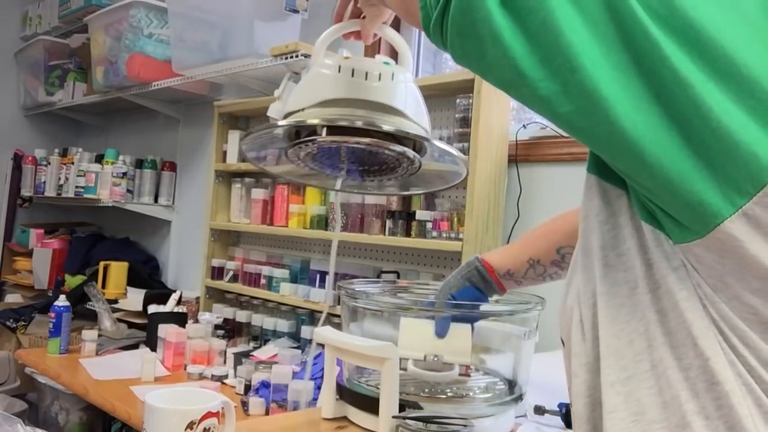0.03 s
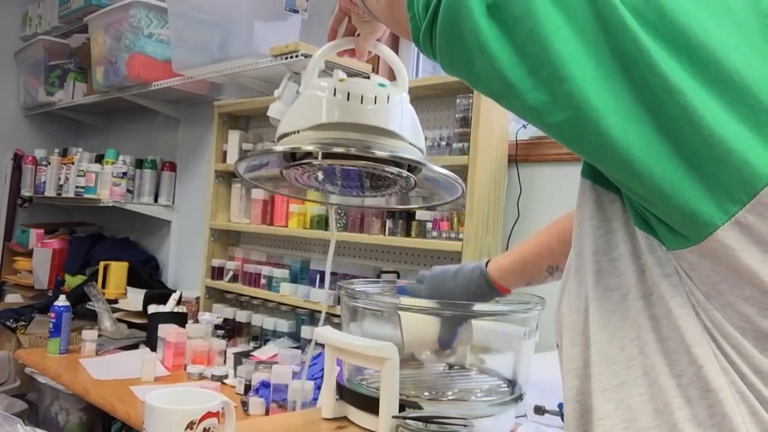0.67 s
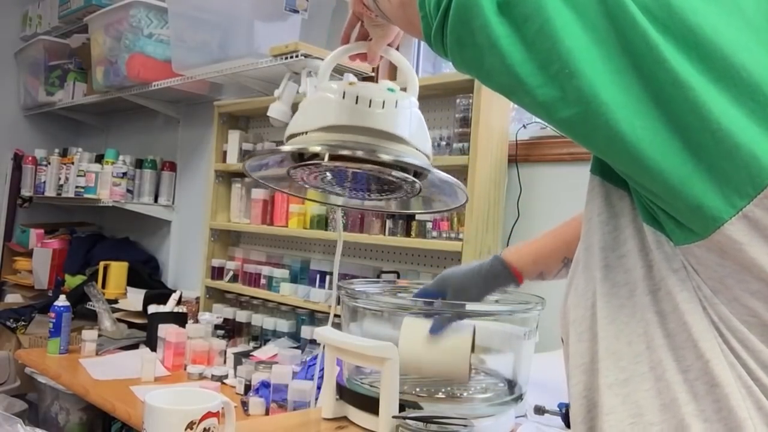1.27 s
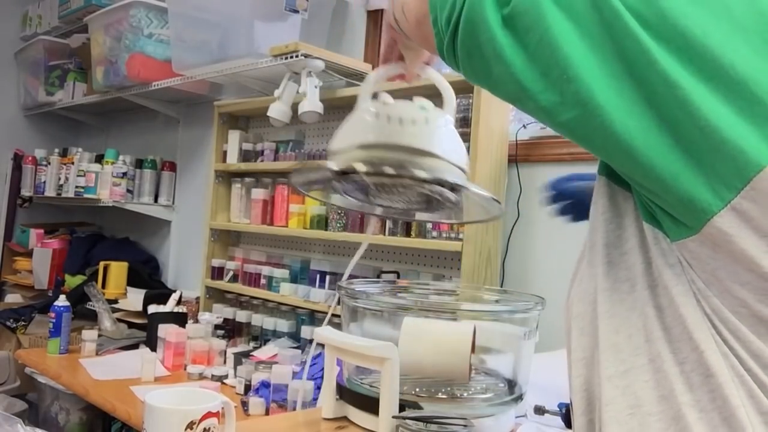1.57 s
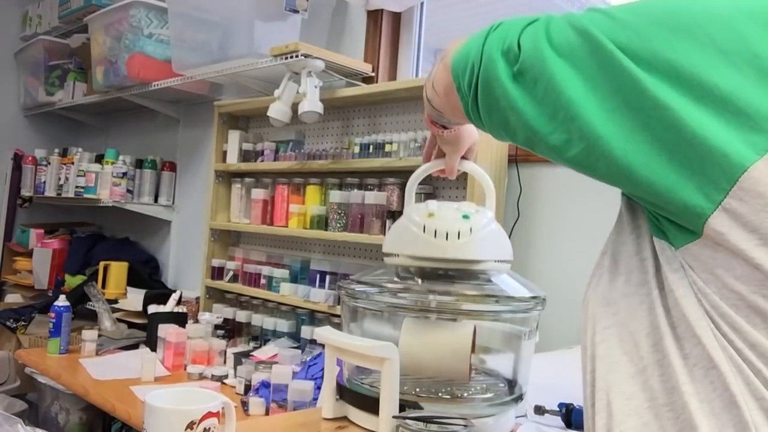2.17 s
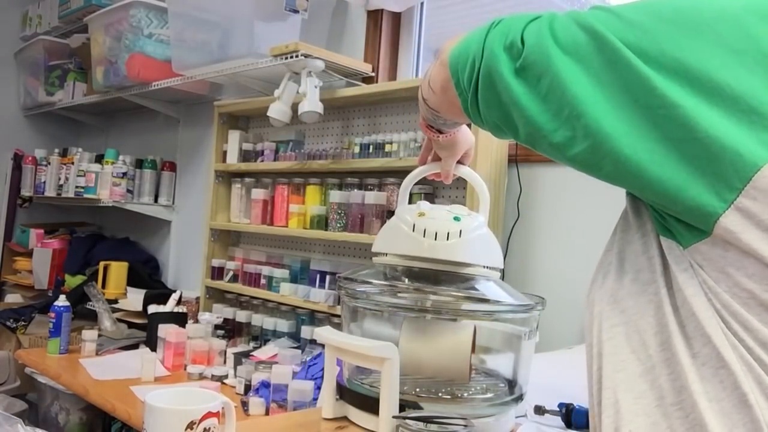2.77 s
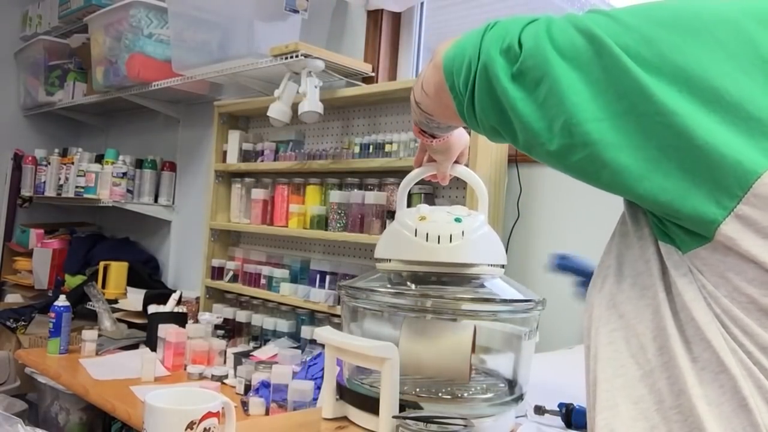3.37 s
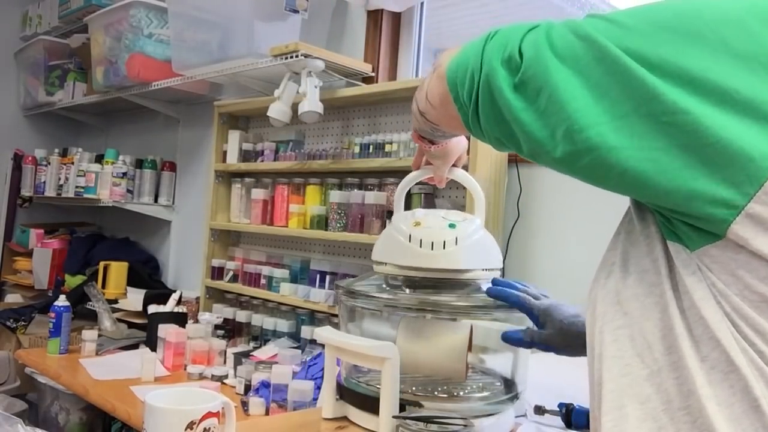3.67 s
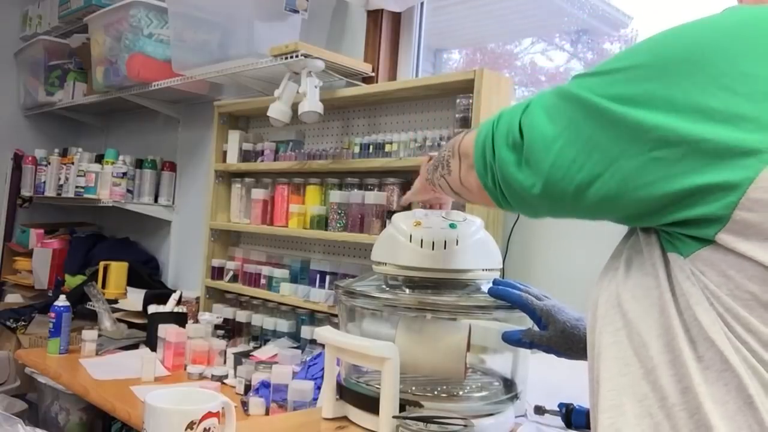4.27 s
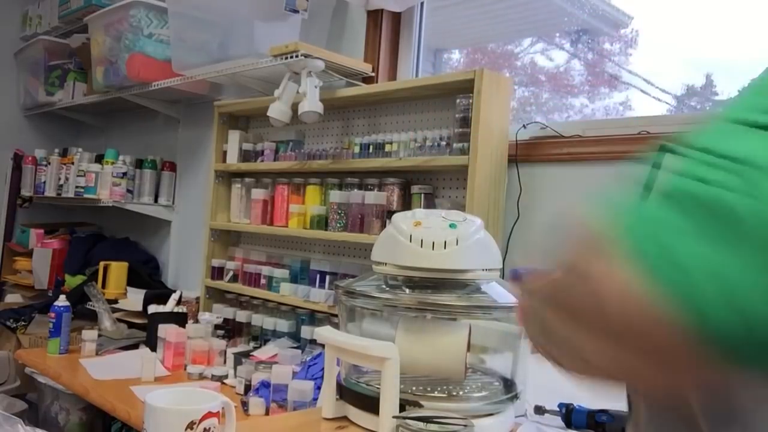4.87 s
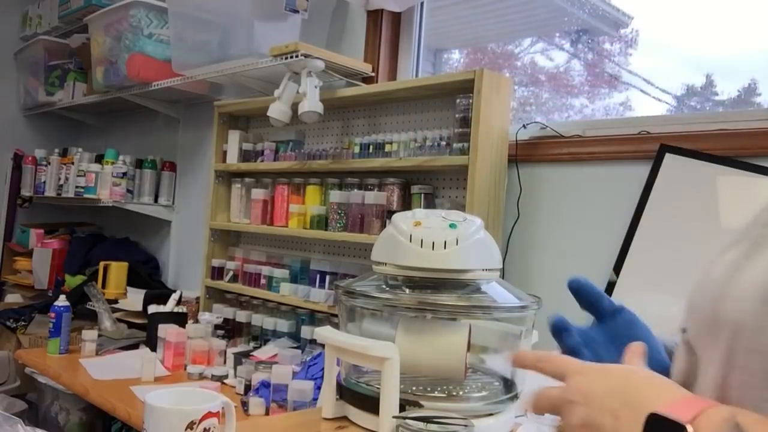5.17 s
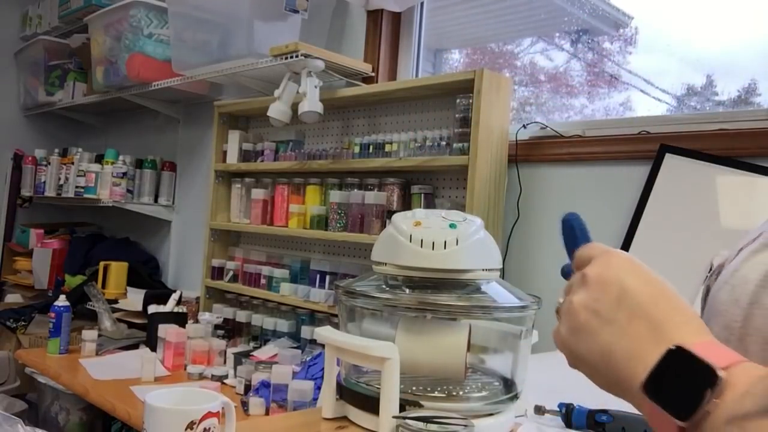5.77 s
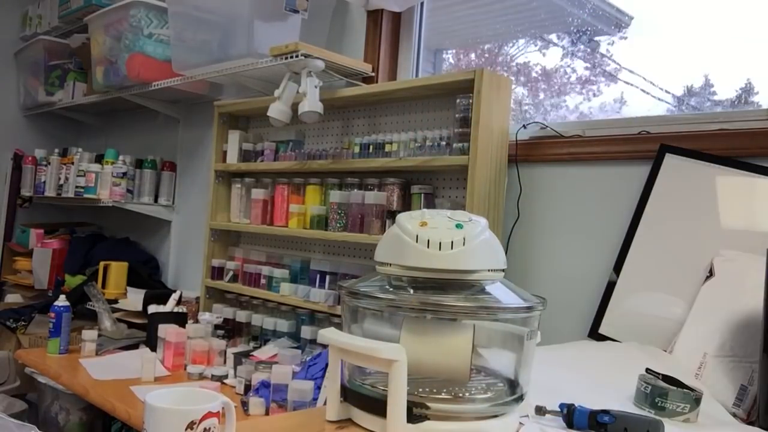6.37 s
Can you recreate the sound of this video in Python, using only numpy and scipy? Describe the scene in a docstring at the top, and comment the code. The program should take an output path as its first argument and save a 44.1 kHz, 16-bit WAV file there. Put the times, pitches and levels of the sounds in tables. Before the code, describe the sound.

Ceramic scrapes and clinks inside a glass countertop oven, then the heavy lid rattles shut and a fan runs up softly.

```python
"""A ceramic mug scrapes, clinks and squeals on the wire rack in the glass bowl of a countertop oven.
The heavy glass lid is set on, rocks on the rim and drops into its seat, ringing the bowl and
thudding into the bench. Its plastic handle snaps down and the convection fan runs up with a hum,
rising blade tones and air noise. A work glove is tugged off and flops onto the bench.
Contacts drive damped modes and noise tails that die with the small workroom."""
import sys
import numpy as np
from scipy import signal
from scipy.fft import irfft
from scipy.io import wavfile

SR = 44100
rng = np.random.default_rng(int(sys.argv[2]) if len(sys.argv) > 2 else 0)


def to_wav(sig):
    """Store sig (one row per channel, or 1-D mono) as 16-bit WAV at the path in sys.argv[1].

    Samples outside -1..1 are clipped; the rate is SR.
    """
    pcm = np.clip(np.atleast_2d(sig), -1, 1) * 32767
    pcm = np.round(pcm).astype(np.int16)
    wavfile.write(sys.argv[1], SR, pcm.T)  # frames by channels


N = 291847
TIME_S = np.arange(N) / SR


def from_db(db):
    """Decibels to gain."""
    return 10 ** (np.asarray(db) / 20)


def unit_rms(x):
    """Scale to rms 1."""
    return x / np.sqrt(np.mean(x ** 2) + 1e-20)


def at_time(curve):
    """A (t/s, value) curve at every sample."""
    return np.interp(TIME_S, *np.transpose(curve))


def at_hz(curve, hz):
    """An (f/Hz, value) curve read on a log-frequency axis."""
    knots_hz, values = np.transpose(curve)
    return np.interp(np.log(hz), np.log(knots_hz), values)


def wander(steps_per_s):
    """Slow random curve, spread about 1."""
    steps = np.clip(rng.standard_normal(2000), -1.7, 1.7)
    return np.interp(TIME_S * steps_per_s, np.arange(len(steps)), steps)


def clicks(times_s, levels_db):
    """One impulse per contact."""
    out = np.zeros(N)
    np.add.at(out, np.clip(np.round(times_s * SR).astype(int), 0, N - 1), from_db(levels_db))
    return out


def strokes(rows, sag_db_per_s, stop_db_per_s):
    """Gain of rubbing strokes: quadratic rise, sloping hold, fast stop."""
    out = np.zeros(N)
    for start_s, rise_s, hold_s, level_db in rows:
        attack = np.clip((TIME_S - start_s) / rise_s, 0, 1) ** 2
        past_rise_s = np.maximum(TIME_S - start_s - rise_s, 0)
        sag_db = sag_db_per_s * np.minimum(past_rise_s, hold_s)
        stop_db = stop_db_per_s * np.maximum(past_rise_s - hold_s, 0)
        out += attack * from_db(level_db - sag_db - stop_db)
    return out


def ring(force, hz, t60_s):
    """One damped mode; a unit click starts it at rms 1."""
    radius, angle = from_db(-60 / (t60_s * SR)), 2 * np.pi * hz / SR
    feedback = [1, -2 * radius * np.cos(angle), radius * radius]
    return signal.lfilter([0, np.sqrt(2) * np.sin(angle)], feedback, force + 1e-18)


def ring_modes(force, modes):
    """Sum of damped modes, alternating in sign."""
    return sum(from_db(db) * (-1) ** k * ring(force, hz, t60_s)
               for k, (hz, db, t60_s) in enumerate(modes))


def leak(energy, t60_s):
    """Stored energy, falling 60 dB in t60_s."""
    return signal.lfilter([1], [1, -from_db(-120 / (t60_s * SR))], energy + 1e-24)


def noise_bands(spectrum):
    """24 noise bands as (f/Hz, signal); total rms about 1."""
    edges_hz = np.geomspace(25, 19500, 25)
    centres_hz = np.sqrt(edges_hz[1:] * edges_hz[:-1])
    white = rng.standard_normal((2, N))
    gains = from_db(at_hz(spectrum, centres_hz)) * np.sqrt(np.diff(edges_hz))
    gains /= np.linalg.norm(gains)
    for k, hz in enumerate(centres_hz):
        bandpass = signal.butter(2, edges_hz[k:k + 2], "band", fs=SR, output="sos")
        yield hz, gains[k] * unit_rms(signal.sosfilt(bandpass, white[k % 2]))


def noise(spectrum):
    """Steady coloured noise, rms about 1."""
    return sum(band for _, band in noise_bands(spectrum))


# room decay: f/Hz, t60/s
ROOM_DECAY = [(60, 0.26), (150, 0.47), (300, 0.21), (700, 0.22), (2000, 0.24), (6000, 0.26), (15000, 0.075)]

def wash(force, spectrum, direct_db, direct_t60_s, room_t60_scale=1.0):
    """Dense overlapping modes as noise: a direct burst, then a tail that dies with the room."""
    energy, out = force ** 2, np.zeros(N)
    direct = from_db(direct_db) ** 2 * leak(energy, direct_t60_s)
    for hz, band in noise_bands(spectrum):
        tail = leak(energy, room_t60_scale * at_hz(ROOM_DECAY, hz))
        lag = np.exp(-4 * hz / SR)  # quarter-cycle build-up
        out += band * signal.lfilter([1 - lag], [1, -lag], np.sqrt(direct + tail))
    return out


# room background: f/Hz, density/dB
ROOM_SPECTRUM = [(15, -64), (25, -35), (47, -14.5), (74, -5.5), (129, -7), (204, -11.5), (247, -12),
                 (363, -19), (404, -25), (546, -20.5), (679, -28), (1670, -31), (2140, -34.5),
                 (17000, -45.5)]

def room_tone(level_db=-61.5):
    """Quiet, steady rumble of the room."""
    return from_db(level_db) * noise(ROOM_SPECTRUM)


# air noise at top speed: f/Hz, density/dB
AIR_SPECTRUM = [(24, -41), (40, -17), (123, -1.5), (152, -9), (203, -6), (405, -14), (479, -20.5),
                (668, -27.5), (1080, -40), (1240, -17), (2260, -36), (2480, -32.5), (12000, -61),
                (15600, -86), (22000, -120)]
# blade tones: harmonic number, level/dB
BLADE_TONES = [(1, -9), (2, -15.5), (4, -27), (6, -23)]
# oven cavity resonances: f/Hz, level/dB, t60/s
CAVITY_MODES = [(253, -14, 0.29), (534.3, -16, 0.3), (681, -12.5, 0.12), (830, -20, 0.15)]

def fan(on_s=4.34, rise_hz_per_s=92.0, hum_hz=125.3, flow_db=-52.5, hum_db=-52):
    """Even run-up: hum grows, air noise swells and brightens, blade tones swell at cavity resonances."""
    blade_hz = rise_hz_per_s * np.maximum(TIME_S - on_s, 1 / SR)
    speed = blade_hz / blade_hz.max()
    slowness = 1 - speed
    air = sum(band * from_db(-12 * slowness * np.log2(1 + hz / 400))
              for hz, band in noise_bands(AIR_SPECTRUM))
    cavity = sum(from_db(db) * unit_rms(ring(rng.standard_normal(N), hz, t60_s))
                 for hz, db, t60_s in CAVITY_MODES)
    phase = 2 * np.pi * np.cumsum(blade_hz) / SR
    blades = from_db(-10 * slowness) * sum(from_db(db) * np.sin(k * phase) for k, db in BLADE_TONES)
    swell = np.zeros(N)
    for hz, _, t60_s in CAVITY_MODES[2:]:
        q = hz * t60_s * np.pi / np.log(1000)
        swell += signal.lfilter(*signal.iirpeak(hz, q, fs=SR), blades)
    flow = air + cavity + blades + from_db(14) * swell
    hum = np.sin(2 * np.pi * hum_hz * TIME_S)
    doublings = np.log2(speed)  # 0 at top speed
    return from_db(flow_db + 14 * doublings) * flow + from_db(hum_db + 11 * doublings) * hum


# tugs on the glove: start/s, rise/s, hold/s, level/dB
GLOVE_TUGS = [(5.33, 0.26, 0.12, -66), (5.76, 0.17, 0.025, -70.5)]
# cloth on skin: f/Hz, density/dB
TUG_SPECTRUM = [(500, -5.5), (1200, 8.5), (3500, 0.5), (7000, -5), (11000, -1), (16500, -0.5)]
# glove landing: t/s, level/dB
GLOVE_FLOPS = [(6.266, -53.5), (6.29, -53.5), (6.298, -50), (6.311, -40.5)]
# cloth on bench: f/Hz, density/dB
FLOP_SPECTRUM = [(59, -32.5), (100, -5), (281, -1), (821, -11.5), (1020, -6), (2110, -11), (3050, -17),
                 (8370, -28), (9930, -43), (17000, -28)]

def glove():
    """Knitted cloth hisses over the skin, then flops down."""
    landing = from_db(-2) * clicks(*np.transpose(GLOVE_FLOPS))
    flop = wash(landing, FLOP_SPECTRUM, direct_db=8.5, direct_t60_s=0.01, room_t60_scale=0.51)
    hiss = strokes(GLOVE_TUGS, sag_db_per_s=-1, stop_db_per_s=127) * noise(TUG_SPECTRUM)
    return hiss + flop


# handle on its catch: t/s, level/dB
LATCH_TICKS = [(4.3305, -41), (4.3352, -43), (4.3415, -24), (4.3487, -29)]
# spring and stop: f/Hz, level/dB, t60/s
SPRING_MODES = [(2300, -1, .008), (5200, 4, .006), (7400, 4, .005), (10500, 5, .004), (14000, 7, .004)]
# plastic housing: f/Hz, level/dB, t60/s
HOUSING_MODES = [(299, -7.5, 0.048), (656, -1, 0.017), (800, -18, 0.1), (1417, -13, 0.066),
                 (2004, -5.5, 0.066), (4950, -7, 0.027), (6290, -9, 0.047)]
# dense housing modes: f/Hz, density/dB
HOUSING_SPECTRUM = [(29, -37), (50, -39), (99, -6), (289, -4), (438, -13), (663, -1.5), (731, 22),
                    (806, -7), (1080, -11.5), (1160, -6.5), (1990, -12.5), (2660, -21.5), (5020, -16.5),
                    (11000, -21.5), (17000, -16)]

def latch():
    """The handle ticks over its catch, ringing the housing; at the hardest tick the spring snaps home."""
    force = clicks(*np.transpose(LATCH_TICKS))
    snap = ring_modes(force * (force == force.max()), SPRING_MODES)
    dense = wash(force, HOUSING_SPECTRUM, direct_db=7, direct_t60_s=0.14)
    return snap + ring_modes(force, HOUSING_MODES) + from_db(-8) * dense


# lid's full weight landing: t/s, level/dB
BENCH_BOOMS = [(2.696, -42), (3.8, -48)]

def bench():
    """The bench top gives under the lid and swings in its lowest mode."""
    return ring(clicks(*np.transpose(BENCH_BOOMS)), hz=78, t60_s=0.38)


# glass bowl: f/Hz, gain from rack/dB, gain from lid/dB, t60/s
BOWL_MODES = [(318, -38, -14, 0.7), (748, -38, -21, 0.85), (1298, -31, -30, 0.5)]

def bowl(force, settling_db_per_s=9.0, seated_s=3.9, seated_db_per_s=128.0):
    """Thick glass sings after blows, less as the lid settles, and stops once it is seated."""
    times_s, _, thud_db, _ = np.transpose(LID_KNOCKS)
    cushioned = np.sign(force) * np.sqrt(np.abs(force))  # springy rack softens hard strikes
    from_rack = from_db(-14.5 - at_time(MUG_WEIGHT)) * cushioned  # weight mutes the glass
    from_lid = clicks(times_s, thud_db - settling_db_per_s * (times_s - times_s[0]))
    song = sum(ring(from_db(rack_db) * from_rack + from_db(lid_db) * from_lid, hz, t60_s)
               for hz, rack_db, lid_db, t60_s in BOWL_MODES)
    return song * from_db(-seated_db_per_s * np.maximum(TIME_S - seated_s, 0))


# mug's load on the rack: t/s, weight/dB
MUG_WEIGHT = [(0.0, 11), (0.45, -1), (0.7, -2), (0.9, 3.5), (1.13, 6), (1.27, 6), (1.5, 10), (3.8, 8.5)]
# bowl and stand: f/Hz, density/dB
STAND_SPECTRUM = [(25, -14.5), (70, 1), (140, 10.5), (220, -19.5), (350, 2.5), (550, 2), (900, -43),
                  (1700, -17.5), (3000, -28)]

def stand_rumble(force, drive_db=-39.5, compression_power=0.59):
    """The mug's weight shakes bowl and stand even when the scrape is gentle."""
    shake = np.sign(force) * np.abs(force) ** compression_power * from_db(drive_db + at_time(MUG_WEIGHT))
    hollow = from_db(-3.5) * ring(shake, hz=570, t60_s=0.063)
    hollow += from_db(-5.5) * ring(shake, hz=365, t60_s=0.15)
    return hollow + wash(shake, STAND_SPECTRUM, direct_db=-1.5, direct_t60_s=0.04, room_t60_scale=0.56)


# friction squeals: start/s, hold/s, f/Hz, level/dB
FRICTION_SQUEALS = [(0.386, 0.019, 7210, -23.5), (0.398, 0.08, 4243, -38.5), (0.438, 0.0099, 6030, -26),
                    (0.439, 0.025, 9354, -30.5), (0.483, .02, 10546, -50), (0.517, 0.03, 2313, -37),
                    (1.134, .015, 7220, -33.5), (1.193, 0.031, 5460, -38), (1.194, 0.029, 6304, -38),
                    (1.201, 0.023, 2277, -43), (3.013, 0.049, 755, -60), (3.218, 0.083, 765, -65.5),
                    (3.833, 0.02, 6560, -46), (3.877, 0.026, 5480, -52.5)]

def squeals(rise_s=0.0017, t60_s=0.04):
    """Friction locks onto one wire or glass mode, holds its level, then lets it ring out."""
    out = np.zeros(N)
    for start_s, hold_s, hz, level_db in FRICTION_SQUEALS:
        active = (TIME_S > start_s) & (TIME_S < start_s + 0.5)
        age_s = TIME_S[active] - start_s
        decay_db = 60 * np.maximum(age_s - hold_s, 0) / t60_s
        envelope = (1 - np.exp(-age_s / rise_s)) * from_db(level_db - decay_db)
        out[active] += np.sqrt(2) * envelope * np.sin(2 * np.pi * (hz * age_s + rng.random()))
    return out


# mug striking the rack: t/s, level/dB
MUG_CLINKS = [(0.0, -48.5), (0.043, -47), (0.189, -56), (0.237, -42), (0.285, -54.5), (0.304, -42.5),
              (0.338, -36), (0.365, -32.5), (0.387, -20.5), (0.439, -27.5), (0.483, -25.5), (0.703, -38),
              (0.846, -32.5), (0.895, -30.5), (1.134, -24.5), (1.184, -23.5), (1.401, -41), (1.447, -42.5),
              (1.56, -61.5), (3.832, -40.5), (3.876, -50)]
# mug pushed over the wires: start/s, rise/s, hold/s, level/dB
MUG_SLIDES = [(0.20, 0.27, 0.28, -27), (0.78, 0.11, 0.062, -30.5), (1.08, 0.12, 0.03, -26.5),
              (3.79, 0.027, 0.02, -45), (3.965, 0.031, 0.0052, -64.5)]

def mug_force(slips_per_s=700, uneven_db=5.0, slip_db=-10.5):
    """Clean strikes plus the tiny uneven slips of unglazed ceramic on wire."""
    slide = strokes(MUG_SLIDES, sag_db_per_s=48.5, stop_db_per_s=201)
    sizes = slide * from_db(slip_db + uneven_db * np.clip(rng.standard_normal(N), -2, 1.5))
    slips = (rng.random(N) < slips_per_s / SR) * sizes * rng.choice([-1, 1], N)
    return clicks(*np.transpose(MUG_CLINKS)) + slips


# main modes of the wire rack: f/Hz, level/dB
RACK_MODES = [(2315, -53), (3494, -63), (4242, -54), (4447, -58), (4624, -61), (5356, -55), (6024, -53),
              (6304, -52), (6412, -51), (6821, -61), (7214, -51), (8376, -61), (8958, -61), (9351, -53),
              (9625, -55), (9927, -62), (10072, -60), (10390, -61), (10546, -50), (11165, -55),
              (12112, -65), (12581, -57), (12947, -60), (13281, -56), (13722, -62), (14303, -58),
              (14653, -59), (14917, -63), (15913, -64), (16258, -57)]
# dense rack modes: f/Hz, density/dB
RACK_SPECTRUM = [(900, -50), (1700, -14), (2300, -9.5), (2900, -4), (3600, -10.5), (4200, -4),
                 (4900, -13.5), (6200, 8), (8000, 2.5), (10000, -31), (12000, -0.5), (16500, -12.5)]

def rack(force, ring_db=34.5, t60_at_4khz_s=0.23, shift_db=4.0, shifts_per_s=28.0):
    """The wires ring, high modes more briefly; the moving contact favours now one mode, now another."""
    out = np.zeros(N)
    for hz, level_db in RACK_MODES:
        t60_s = t60_at_4khz_s * (hz / 4000) ** -0.3
        coupling = from_db(shift_db * wander(shifts_per_s)) * rng.choice([-1, 1])
        out += from_db(level_db + ring_db) * ring(force * coupling, hz, t60_s)
    for _ in range(2):
        coupling = from_db(shift_db * wander(shifts_per_s))
        out += from_db(-8.5) * signal.fftconvolve(force * coupling, weak_rack_modes())[:N]
    dense = wash(force, RACK_SPECTRUM, direct_db=8, direct_t60_s=0.012, room_t60_scale=0.8)
    out += from_db(-11.5) * dense
    lows = signal.sosfiltfilt(signal.butter(1, 8500, fs=SR, output="sos"), out)
    treble_gain = from_db(-0.88 * at_time(MUG_WEIGHT))  # a light touch is brighter
    return lows + treble_gain * (out - lows)


def weak_rack_modes(t60_s=0.15, spread_at_6khz_hz=140.0, per_mode=12):
    """Impulse response of the lesser modes crowding around each main one."""
    age_s = np.arange(SR // 2) / SR
    main_hz, level_db = np.repeat(RACK_MODES, per_mode, axis=0).T
    offset_hz = spread_at_6khz_hz * rng.laplace(size=len(main_hz)) * np.sqrt(main_hz / 6000)
    hz = np.clip(main_hz + offset_hz, 1500, 17400)
    spectrum = np.zeros(SR // 2 + 1, complex)  # 1 Hz bins
    spectrum[hz.astype(int)] = from_db(level_db / 2) * np.exp(2j * np.pi * rng.random(len(hz)))
    return unit_rms(irfft(spectrum))[:len(age_s)] * from_db(-60 * age_s / t60_s)


# damped oven body: f/Hz, level/dB, t60/s
OVEN_MODES = [(141, -10.5, 0.21), (309, -5, 0.069), (647, -17, 0.24), (1640, -28, 0.12)]
# oven body and bench: f/Hz, density/dB
THUD_SPECTRUM = [(25, -27), (45, -19), (70, -0.5), (120, -1), (190, 4), (320, 7.5), (450, -12), (650, -0.5),
                 (950, -34.5), (1600, -14), (2500, -76), (6000, -65)]

def oven_thud(force):
    """A knock passes through the oven body into the bench."""
    dense = wash(force, THUD_SPECTRUM, direct_db=2, direct_t60_s=0.059)
    return ring_modes(force, OVEN_MODES) + from_db(-4.5) * dense


# rim grinding into its seat: start/s, rise/s, hold/s, level/dB
RIM_GRINDS = [(3.76, 0.012, 0.029, -31.5)]
# hard glass contact: f/Hz, density/dB
CRACK_SPECTRUM = [(200, 24), (900, 10.5), (1700, 12), (3300, 4.5), (4500, 8), (6500, 1), (9000, 1),
                  (12000, -2), (16500, -3)]

def rim_crack(force, grains_per_s=500, grain_db=-10.0):
    """Glass on glass: a sharp crack per knock, a short grind as the lid seats."""
    seating = strokes(RIM_GRINDS, sag_db_per_s=117, stop_db_per_s=600)
    grains = rng.standard_normal(N) * (rng.random(N) < grains_per_s / SR)
    grind = from_db(grain_db) * seating * grains
    return from_db(-1) * wash(force + grind, CRACK_SPECTRUM, direct_db=-0.5, direct_t60_s=0.016)


# lid meeting the rim: t/s, ring/dB, thud/dB, crack/dB
LID_KNOCKS = [(2.2192, -44, -53, -33), (2.223, -33, -23.5, -79), (2.271, -60, -59.5, -48),
              (2.37, -53, -44, -47.5), (2.484, -52, -37.5, -57), (2.586, -50.5, -40.5, -69),
              (2.657, -57, -36, -44), (2.692, -27, -33, -46), (2.715, -31, -33, -49.5),
              (2.761, -35.5, -74, -48.5), (2.913, -34.5, -39, -54.5), (3.043, -48, -52, -68),
              (3.072, -36, -40.5, -52.5), (3.2, -35.5, -47, -93), (3.339, -31.5, -43, -49.5),
              (3.411, -51, -45, -56.5), (3.4451, -28.5, -34.5, -49.5), (3.7202, -55, -43.5, -48),
              (3.773, -36.5, -31, -44), (3.784, -31, -23, -60), (3.812, -26.5, -47, -43),
              (3.836, -29, -30, -60), (4.194, -71, -53.5, -70)]
# glass lid: f/Hz, level/dB, t60/s
LID_MODES = [(179.4, -17, 0.48), (229.6, -1, 0.17), (271, -9, 0.068), (441, -28.5, 0.21), (510, -32, 0.32),
             (634, -22.5, 0.27), (799, -27, 0.16), (786, -14.5, 0.094), (1080, -39, 0.32),
             (1322, -23, 0.13), (1536, -53, 0.1), (2043, -28, 0.17), (2440, -64, 0.18), (2902, -22.5, 0.17),
             (3910, -30.5, 0.19), (4074, -13, 0.03), (4080, -20, 0.11), (4500, -23.5, 0.097),
             (5570, -48, 0.14), (5400, -32, 0.13), (6400, -32.5, 0.1), (7100, -37, 0.091)]

def lid(vary_db=1.56, hard_db=19.0, crossover_hz=2500):
    """Each knock rings the lid, thuds through the oven and cracks on the rim."""
    times_s, ring_db, thud_db, crack_db = np.transpose(LID_KNOCKS)
    glass = np.zeros(N)
    for k, (hz, level_db, t60_s) in enumerate(LID_MODES):
        hard_share = hz / (hz + crossover_hz)  # only hard contacts reach the high modes
        drive_db = (1 - hard_share) * ring_db + hard_share * (crack_db + hard_db)
        drive_db += vary_db * rng.standard_normal(len(times_s))
        glass += (-1) ** k * ring(clicks(times_s, level_db + drive_db), hz, t60_s)
    return glass + oven_thud(clicks(times_s, thud_db)) + rim_crack(clicks(times_s, crack_db))


def scene():
    """Mug, lid, latch, glove and fan over the room tone; mono."""
    force = mug_force()
    oven = rack(force) + squeals() + stand_rumble(force) + bowl(force) + lid()
    return (oven + bench() + latch() + glove() + fan() + room_tone())[None]


def record(dry, low_cut_hz=38, high_cut_hz=17500):
    """The microphone loses the deepest bass; the top is cut steeply."""
    highpass = signal.butter(4, low_cut_hz, "high", fs=SR, output="sos")
    lowpass = signal.ellip(10, 0.1, 80, high_cut_hz, fs=SR, output="sos")
    return signal.sosfilt(lowpass, signal.sosfilt(highpass, dry))


dry = scene()
out = record(dry)
to_wav(out)
```